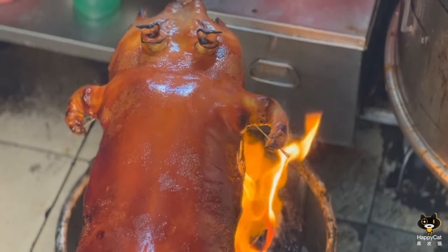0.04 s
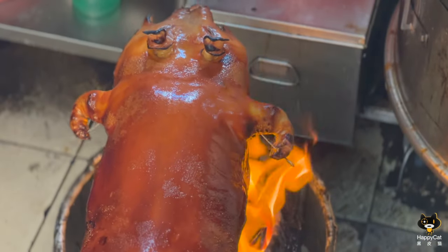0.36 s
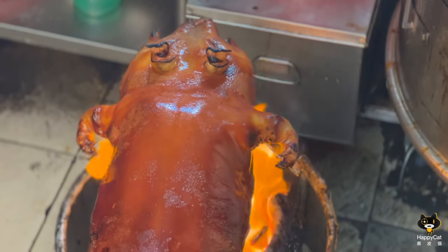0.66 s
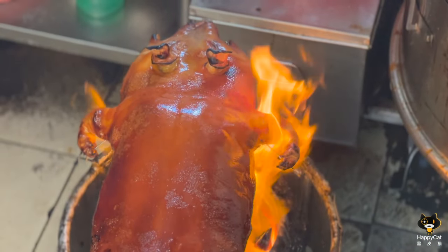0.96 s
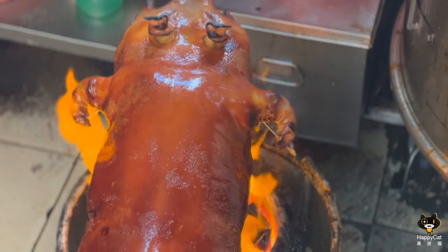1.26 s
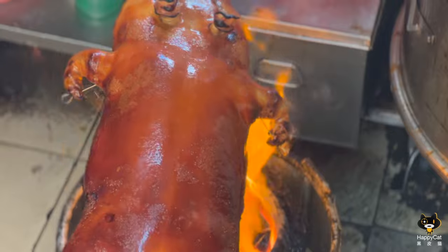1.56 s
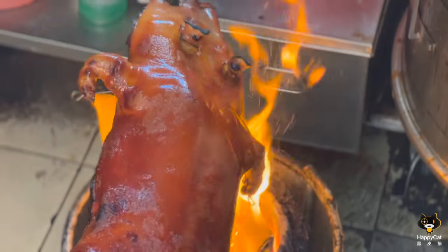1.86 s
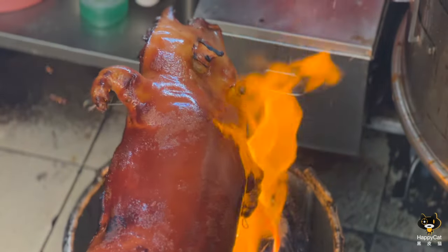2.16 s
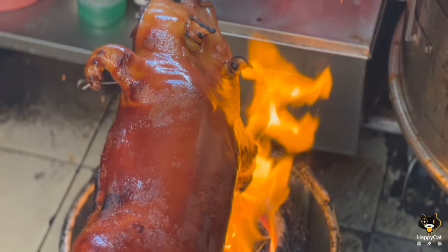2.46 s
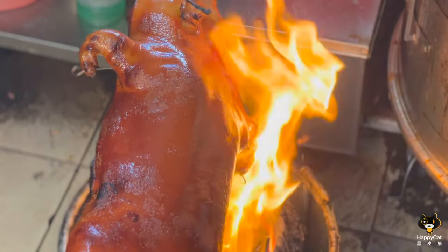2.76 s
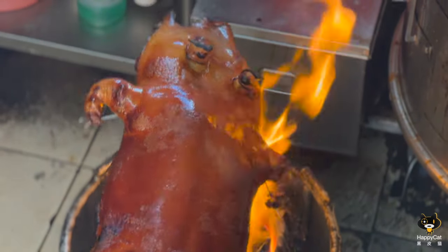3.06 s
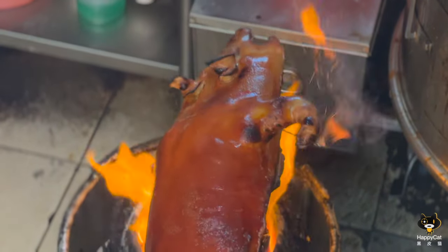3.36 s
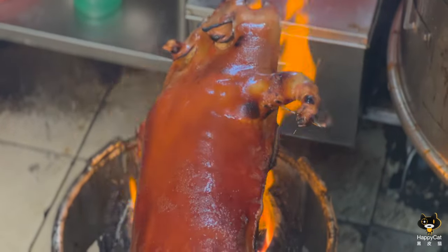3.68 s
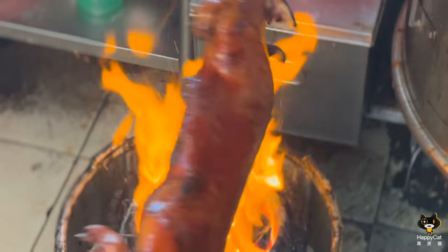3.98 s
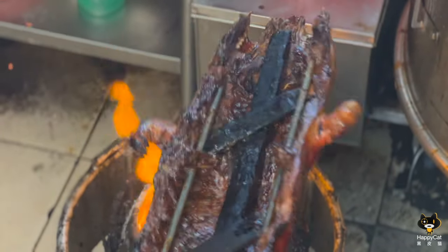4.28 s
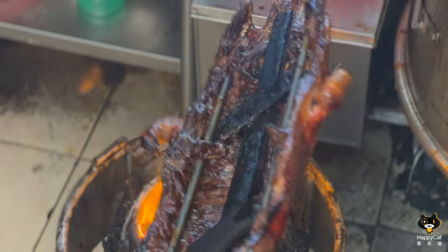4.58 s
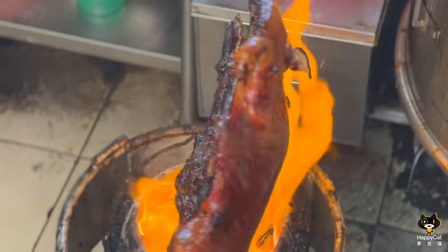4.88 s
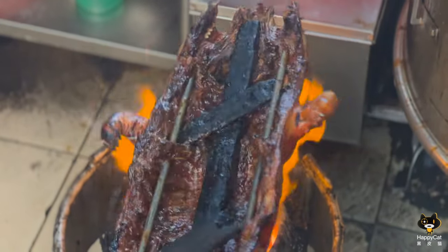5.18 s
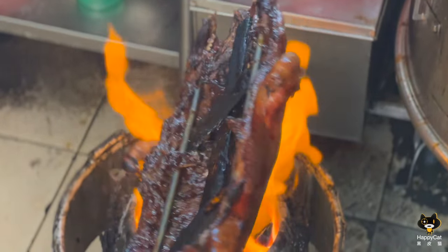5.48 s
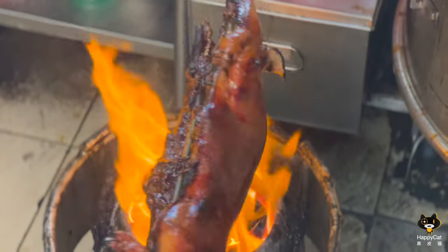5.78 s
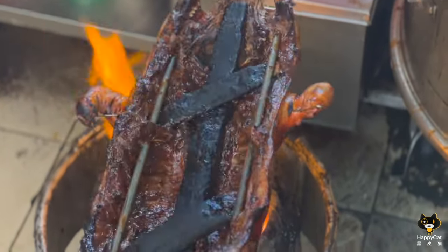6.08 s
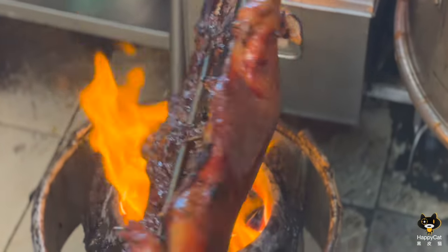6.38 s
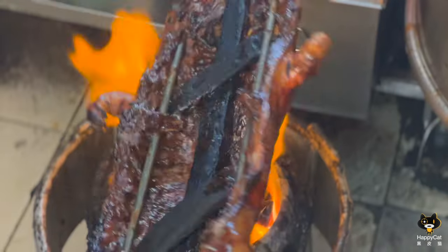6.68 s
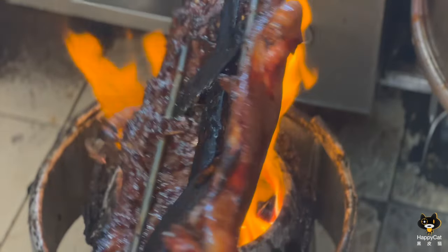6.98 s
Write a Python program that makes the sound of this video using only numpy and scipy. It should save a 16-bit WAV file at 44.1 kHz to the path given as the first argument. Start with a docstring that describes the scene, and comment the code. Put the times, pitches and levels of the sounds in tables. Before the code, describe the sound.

After a brief silence, the sound fades in from about 0.4 seconds and reaches full level near 2.6 seconds. A stereo microphone faces a drum of burning charcoal under a pig on a spit, in an open stall kitchen. The flames make a low, booming roar with a flutter and a soft, even rush of air above. Behind them, slightly right, a fan drones on one low tone that swells and dips, with very faint whines.

Fat fries on the coals throughout as a fine, quiet hiss of tiny bubbles. From about 1.4 seconds, falling drops flash to steam in short, bright, irregular spits and pops. These are thickest and strongest between 2.5 and 4.6 seconds, then thin out, with another small cluster from 5.8 to 6.5 seconds. The roar grows slightly over the last two seconds, while the drone weakens just before the end at 7 seconds.

```python
"""A low roar of flames and a steady drone swell in from silence, in an open stall kitchen.
The stereo microphone faces a drum of burning charcoal under a pig on a spit. The flames boom in
the drum, with the rush of the draught above them. Fat fries on the coals in tiny bursting bubbles,
and falling drops spit as they flash to steam. The drone is a fan behind the fire."""
import sys
import numpy as np
from scipy import signal
from scipy.fft import rfft, irfft
from scipy.io import wavfile

SR = 44100
rng = np.random.default_rng(int(sys.argv[2]) if len(sys.argv) > 2 else 0)


def wav_record(signal):
    """Record a signal, one row per channel, as 16-bit PCM in the file named by sys.argv[1]."""
    frames = np.transpose(np.atleast_2d(signal))
    bounded = np.clip(frames, -1, 1)
    # unit amplitude maps onto the largest positive 16-bit level
    quanta = np.round(bounded * 32767).astype(np.int16)
    wavfile.write(sys.argv[1], SR, quanta)


N = 310464
TIME = np.arange(N) / SR
HZ = np.maximum(np.arange(N // 2 + 1) * SR / N, 1)


def flames():
    """Combustion noise booms in the drum, with flutter and an even rush of air above it."""
    # How hard the fire burns. Each row: time in seconds, relative level in dB.
    blaze = [(0.4, 0.5), (1.3, 1), (1.7, -2), (2.05, 1), (2.7, -2), (3.3, 1), (3.9, -1.4), (4.6, 0.2),
             (5.1, 0.5), (5.75, 1.5), (6.4, 2), (7.04, 3.5)]
    # Resonances of the drum and the stall. Each row: frequency in Hz, width in Hz, lift in dB.
    drum_modes = [(60.7, 5.2, 7), (88, 5, 5), (106, 14.7, 9.5), (128, 52, 4), (183.8, 23.7, 9.5),
                  (230.6, 10.4, 5), (307, 18, 3.5), (370, 13.4, 6), (455.7, 7.6, 8), (565, 11, 3)]
    # Spectra of the fire's three voices. Each row: frequency in Hz, relative level in dB.
    roar_spectrum = [(12, -38), (24, -21), (34, -22), (48, -10), (75, -4.5), (105, -0.5), (152, 1),
                     (170, -9), (220, -14), (400, -35)]
    flutter_spectrum = [(120, -14.5), (200, -4), (300, -1.5), (420, -7.5), (600, -8), (850, -15.5),
                        (1500, -43)]
    rush_spectrum = [(400, -14), (800, -1), (1100, 0.5), (1700, -3.5), (2500, -4.5), (3200, -9.5),
                     (4200, -14.5), (7000, -16), (9000, -21), (15000, -24.5)]
    # One brief flap of flame: time of its peak in seconds, half-length in seconds, lift in dB.
    flame_flap = (1.1, 0.018, 5.3)
    flap_at, flap_s, flap_db = flame_flap
    flap = from_db(flap_db * np.exp(-((TIME - flap_at) / flap_s) ** 2))
    drum = from_db(sum(db * resonance(hz, width) for hz, width, db in drum_modes))
    fire_db = in_time(blaze)
    throb_db = 0.7 * drift(per_s=9)
    roar = from_db(-27 + 0.73 * fire_db + throb_db) * turbulence(over_hz(roar_spectrum) * drum)
    flutter = from_db(-37.5 + 0.82 * fire_db) * flap * turbulence(over_hz(flutter_spectrum) * drum)
    rush = from_db(-42) * turbulence(over_hz(rush_spectrum) * reflections(ripple_db=2, spacing_hz=14))
    return roar * from_db([[-.7], [.5]]) + flutter + rush  # the roar sits slightly right


def sizzle(frying_db, spurts_per_s, spurt_db, spurt_decay_s):
    """Fat fries all the time; droplets too small to pick out make it come in short spurts."""
    # Hiss of frying fat. Each row: frequency in Hz, relative level in dB.
    spectrum = [(2500, -16), (4600, -3), (5600, -7), (7000, 1), (9800, -2), (11500, -1.5), (13000, -8),
                (15500, -6)]
    droplets = (rng.random(N) < spurts_per_s / SR) * rng.random(N) ** 2
    spurts = signal.lfilter([1], [1, -np.exp(-2 / (spurt_decay_s * SR))], droplets + 1e-18)
    swell = rms_one(np.sqrt(1 + from_db(spurt_db) ** 2 * spurts))
    colour = over_hz(spectrum) * reflections(ripple_db=-2, spacing_hz=47.8)
    return from_db(frying_db + 8.5) * swell * in_stall(bubbles(per_s=11000, spread_db=4.5), colour)


def drops(small_drops, rise_s, tail_db, tail_s):
    """A drop flashes to steam: a bright spit over a duller pop, then a tail off steel and tiles."""
    # Big drops of fat hit the coals. Each row: start in seconds, relative level in dB,
    # relative weight of the pop in dB, decay in seconds.
    big_drops = [(1.411, -45, -17, 0.01), (1.541, -52.5, 6, 0.013), (1.677, -44, -9, 0.023),
                 (1.976, -46, -7, 0.014), (2.113, -46, -7, 0.016), (2.215, -44, -6, 0.003),
                 (2.358, -45, -11, 0.038), (2.563, -48, -4, 0.043), (2.59, -39.5, -7, 0.024),
                 (2.708, -51, -2, 0.013), (2.886, -47, -8, 0.015), (2.954, -41, -6, 0.014),
                 (3.186, -49, -3, 0.02), (3.297, -45, -7, 0.058), (3.388, -44.5, -4, 0.03),
                 (3.484, -43, -17, 0.011), (3.555, -38, -7.5, 0.012), (3.648, -43, -17, 0.004),
                 (3.76, -41.5, -6, 0.019), (3.858, -43, -10, 0.03), (3.963, -45, -7, 0.014),
                 (4.01, -39, -7, 0.0085), (4.08, -41, -13, 0.024), (4.125, -41.5, -2.5, 0.017),
                 (4.312, -38, -1, 0.014), (4.404, -42, -14, 0.018), (4.548, -40, -3.5, 0.026),
                 (4.792, -46.5, -5, 0.03), (5.227, -48, -4, 0.038), (5.296, -45, -10, 0.024),
                 (5.826, -45.5, -16, 0.018), (6.017, -46, -10, 0.031), (6.061, -48, -5, 0.012),
                 (6.237, -47, -4, 0.02), (6.254, -41.5, -9, 0.022), (6.447, -44, -14, 0.018)]
    # Spectra of the spit and the pop. Each row: frequency in Hz, relative level in dB.
    spit_spectrum = [(2000, 2.5), (4500, -28.5), (7500, -2.5), (10000, 4.5), (11800, 3.5), (13500, 2),
                     (15500, 3)]
    pop_spectrum = [(1500, -26), (3200, -13), (3900, 2.5), (5000, 1.5), (7500, 5.5), (10000, -5),
                    (15000, -22)]
    spit, pop = np.zeros(N), np.zeros(N)
    age = TIME[:SR // 3]
    attack = 1 - np.exp(-age / rise_s)
    tail = from_db(tail_db) * np.exp(-age / tail_s)
    for start_s, db, pop_db, decay_s in big_drops + small_drops:
        at = int(start_s * SR)
        burst = (from_db(db) * attack * (np.exp(-age / decay_s) + tail))[:N - at]
        spit[at:at + len(burst)] += burst
        pop[at:at + len(burst)] += burst * from_db(pop_db)
    colour = over_hz(spit_spectrum) * reflections(ripple_db=3, spacing_hz=112.9)
    steam = in_stall(bubbles(per_s=9200, spread_db=1.5), colour)
    return from_db(0.1) * spit * steam + from_db(1.6) * pop * turbulence(over_hz(pop_spectrum))


def drips(frying_db, per_s, pop_db, decay_s):
    """Rows for small drops that fall at random, stronger while more fat is frying."""
    falls = np.flatnonzero(rng.random(N) < per_s / SR)
    db = frying_db + 11 - 1.5 * rng.standard_normal(N)
    return [(at / SR, db[at], pop_db, decay_s) for at in falls]


def bubbles(per_s, spread_db):
    """Tiny bursting bubbles: random clicks of uneven size."""
    sizes = from_db(spread_db * np.minimum(rng.exponential(1, N), 4)) * rng.choice([-1, 1], N)
    return sizes * (rng.random(N) < per_s / SR)


def fan(drone_hz, sag_hz_per_s):
    """Behind the fire, slightly right: one strong, wavering low tone and a few faint, narrow whines."""
    # Swells and dips of the drone. Each row: time in seconds, relative level in dB.
    drone_levels = [(0.4, -21), (0.56, -27), (1.0, -22), (1.88, -23.5), (1.97, -29), (2.3, -23),
                    (2.87, -20.5), (3.04, -28.5), (3.2, -21.5), (3.38, -27.5), (3.54, -19.5), (3.84, -29.5),
                    (3.97, -20), (4.34, -25), (4.6, -20), (4.95, -20.5), (5.04, -30.5), (5.11, -19),
                    (5.5, -22.5), (6.1, -26.5), (6.2, -20.5), (6.38, -26), (7.04, -30.5)]
    # Whines of the fan. Each row: frequency in Hz, width in Hz, relative level in dB.
    tones = [(279, 12, -7), (312.2, 4.9, -4), (377.4, 6.3, -3), (546, 4.3, -4.5), (2546, 7, -14.5),
             (2640, 18, -22.5), (6240, 20, -19)]
    drone_db = in_time(drone_levels) + 1.32 * drift(per_s=9.5)
    pitch_hz = drone_hz - sag_hz_per_s * TIME
    drone = from_db(drone_db) * np.sqrt(2) * np.sin(2 * np.pi * np.cumsum(pitch_hz) / SR)
    whine_colour = sum(from_db(db) * rms_one(resonance(hz, width)) for hz, width, db in tones)
    whines = from_db(-50) * turbulence(whine_colour)
    return (drone + whines) * from_db([[-.8], [.3]])


def in_stall(source, colour):
    """A mono source, coloured and spread around the microphone by the stall's diffuse sound; rms 1."""
    # Stereo width. Each row: frequency in Hz, side against mid in dB.
    width = [(25, -13), (60, -15), (105, -18), (150, -8.5), (230, -9.5), (285, -15), (420, -7.5),
             (545, -7.5), (680, -3.5), (1500, -3.5), (2400, -17.5), (3500, -8.5), (4100, -22), (4800, -59)]
    side = over_hz(width)
    diffuse = side * rfft(rng.standard_normal(N)) * np.array([[1], [-1]])
    return rms_one(irfft(colour * (rfft(rms_one(source)) + diffuse) / np.sqrt(1 + side ** 2), N))


def reflections(ripple_db, spacing_hz):
    """Echoes off steel and tiles add and cancel, leaving a fixed, uneven ripple on the spectrum."""
    ripple = rng.standard_normal(SR)
    return from_db(ripple_db * np.interp(HZ / spacing_hz, np.arange(SR), ripple))


def turbulence(colour):
    """Stereo noise of a given colour; rms 1."""
    return in_stall(rng.standard_normal(N), colour)


def resonance(hz, width_hz):
    """Power response of one resonance, 1 on top."""
    return 1 / (1 + (2 * (HZ - hz) / width_hz) ** 2)


def drift(per_s):
    """A smooth random wander with spread 1."""
    return rms_one(irfft(rfft(rng.standard_normal(N)) / (1 + (HZ / per_s) ** 4), N))


def over_hz(points):
    """A spectrum as gain at every frequency; it falls away above its last point."""
    hz, db = np.transpose(points)
    return from_db(np.interp(np.log(HZ), np.log(hz), db)) * np.minimum(hz[-1] / HZ, 1) ** 2


def in_time(points):
    """A curve over time, sample by sample."""
    return np.interp(TIME, *np.transpose(points))


def from_db(db):
    """Decibels to gain."""
    return 10 ** (np.asarray(db) / 20)


def rms_one(x):
    """Scale to unit power."""
    return x / np.sqrt(np.mean(x ** 2) + 1e-20)


def scene():
    """Facing the drum: the fire and frying fat in front, the fan behind them."""
    # How hard the fat fries on the coals. Each row: time in seconds, relative level in dB.
    frying = [(0.5, -69), (1.25, -61), (1.85, -64.5), (2.7, -60), (3.08, -65), (3.8, -60.5), (4.9, -61.5),
              (5.6, -63.5), (6.05, -60.5), (6.6, -66), (7.04, -65.5)]
    frying_db = in_time(frying)
    fire = flames()
    drone = fan(drone_hz=134.6, sag_hz_per_s=0.0793)
    fat = sizzle(frying_db, spurts_per_s=30, spurt_db=7, spurt_decay_s=0.016)
    small_drops = drips(frying_db, per_s=4, pop_db=-9, decay_s=0.012)
    spits = drops(small_drops, rise_s=0.00072, tail_db=-17, tail_s=0.036)
    return fire + fat + spits + drone


def record(dry):
    """At the microphone the channels part in phase in the treble; the sound fades in, its top cut."""
    # Phase between the two channels. Each row: frequency in Hz, lead of the left in radians.
    channel_phase = [(0, 0.0), (1550, -0.9), (3200, 0.6), (4100, 0.1), (8650, -0.1), (9100, -1.6),
                     (10000, -3.1), (10350, -3.2), (11750, -6.1), (12300, -6.3), (13650, -9.4),
                     (13950, -9.5), (15250, -12.4)]
    start_s, fade_s, cutoff_hz = 0.39, 2.23, 15720
    fade = np.clip((TIME - start_s) / fade_s, 0, 1) ** 0.85
    lead = np.interp(HZ, *np.transpose(channel_phase))
    channels = irfft(rfft(dry) * np.exp(.5j * lead * np.array([[1], [-1]])), N)
    lowpass = signal.ellip(12, .1, 80, cutoff_hz, fs=SR, output="sos")
    return signal.sosfilt(lowpass, channels * fade)


dry = scene()
out = record(dry)
wav_record(out)
```